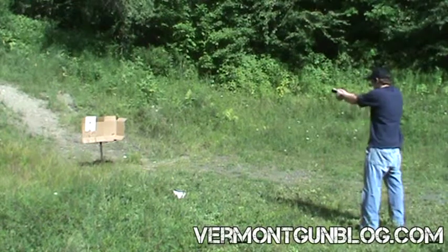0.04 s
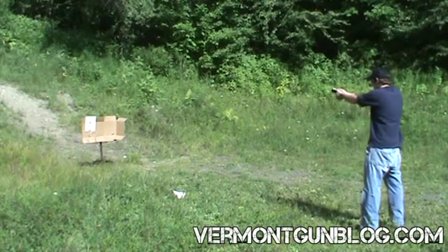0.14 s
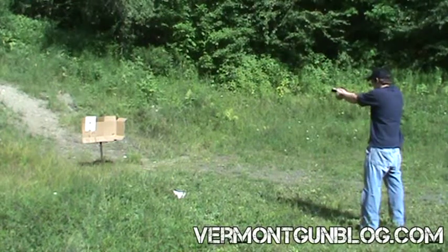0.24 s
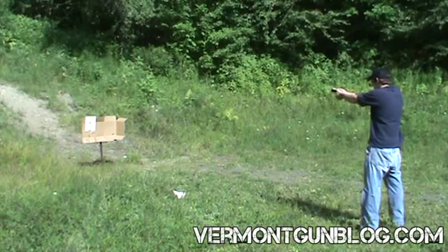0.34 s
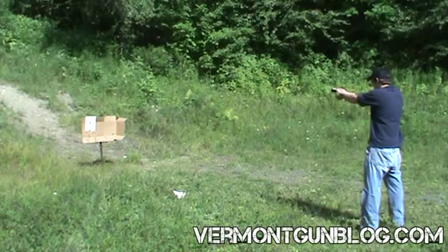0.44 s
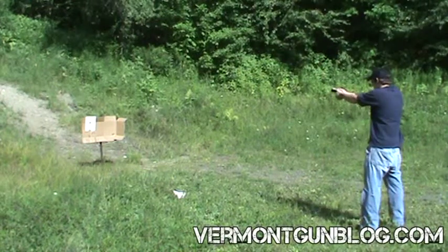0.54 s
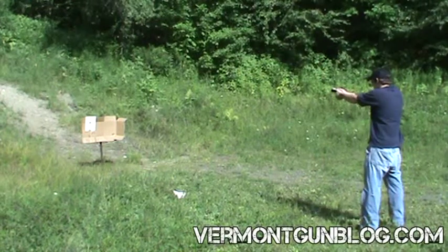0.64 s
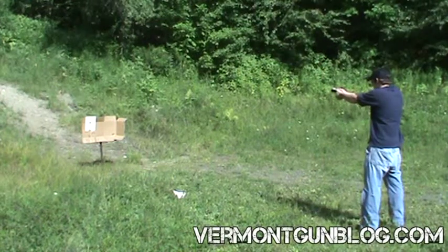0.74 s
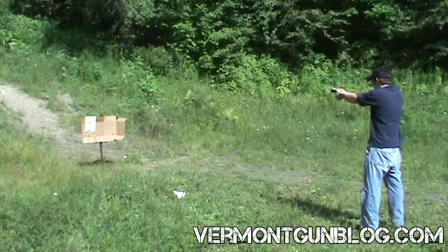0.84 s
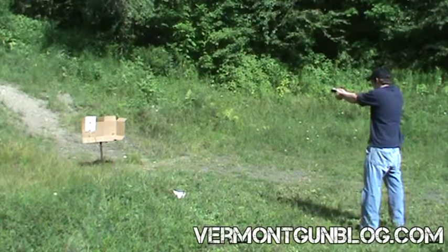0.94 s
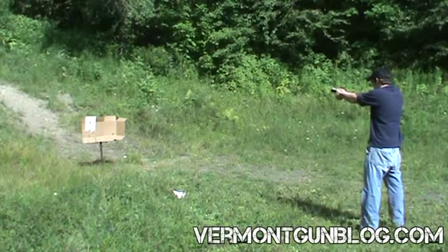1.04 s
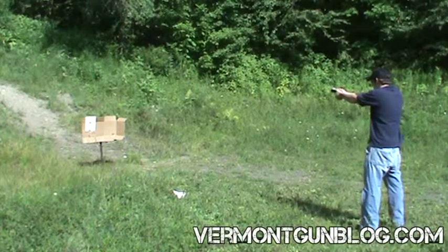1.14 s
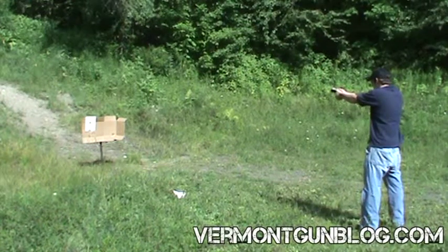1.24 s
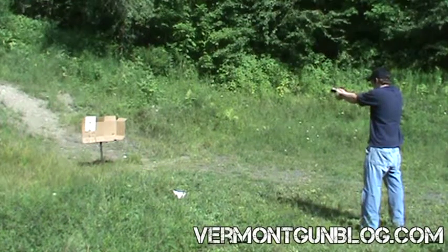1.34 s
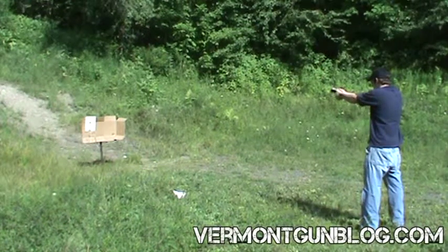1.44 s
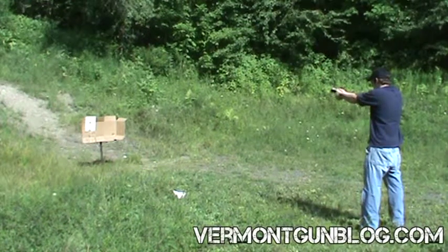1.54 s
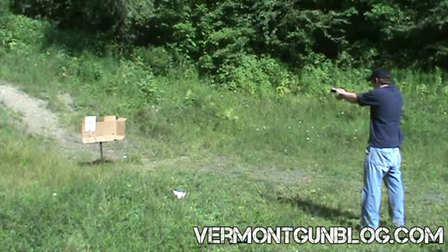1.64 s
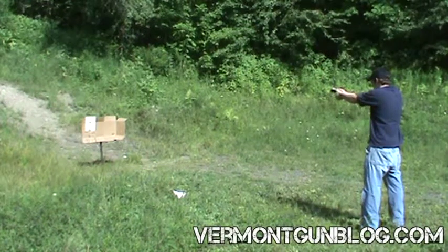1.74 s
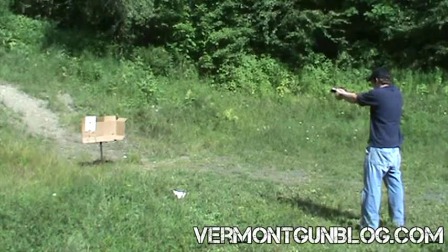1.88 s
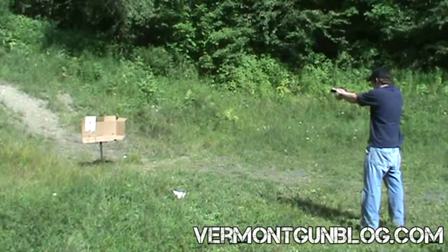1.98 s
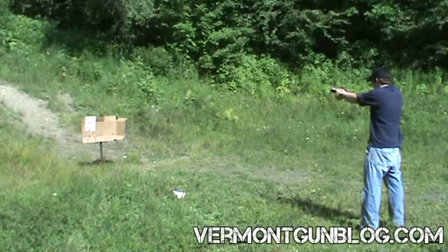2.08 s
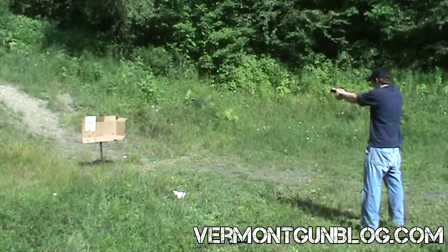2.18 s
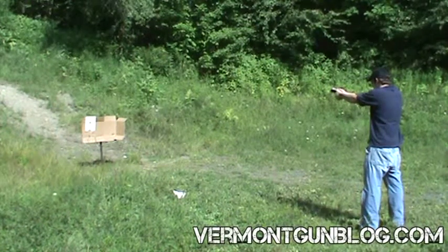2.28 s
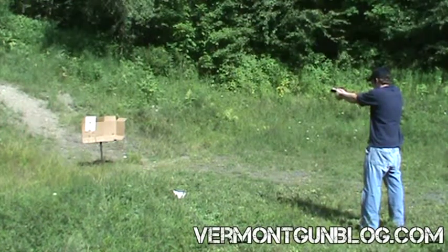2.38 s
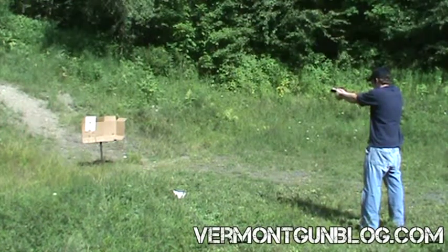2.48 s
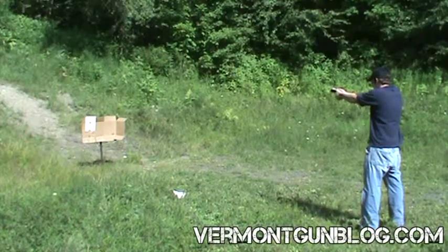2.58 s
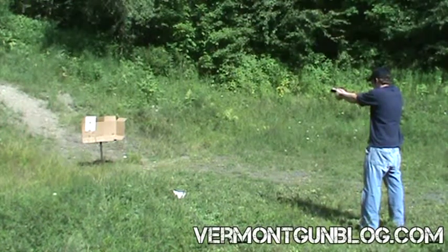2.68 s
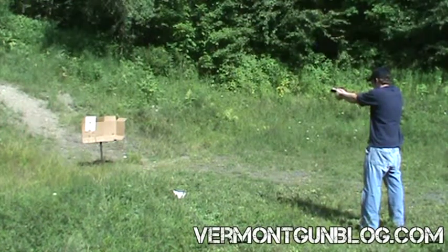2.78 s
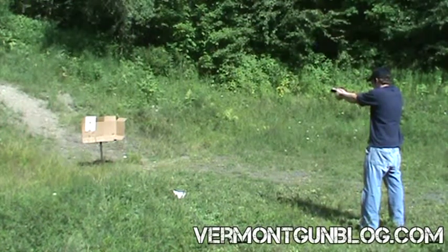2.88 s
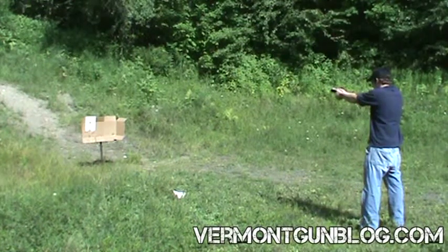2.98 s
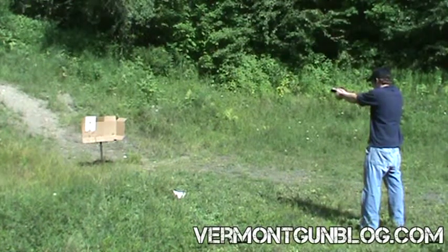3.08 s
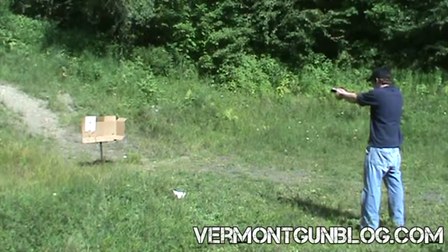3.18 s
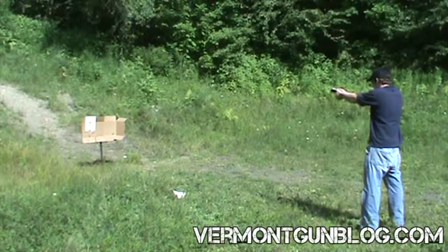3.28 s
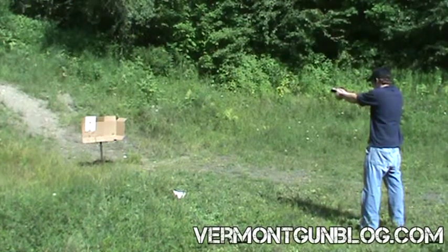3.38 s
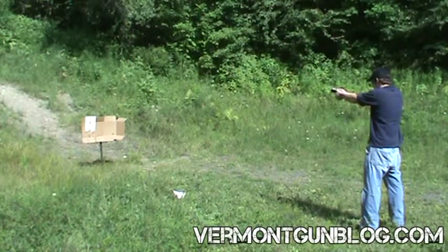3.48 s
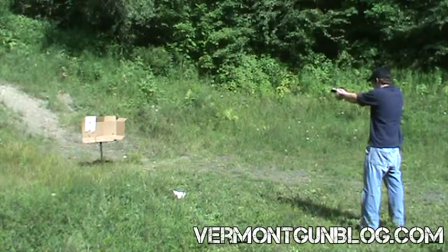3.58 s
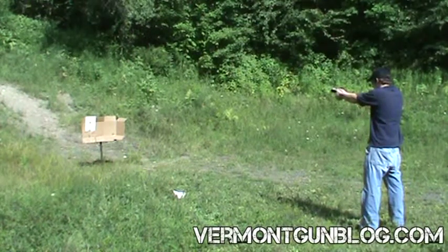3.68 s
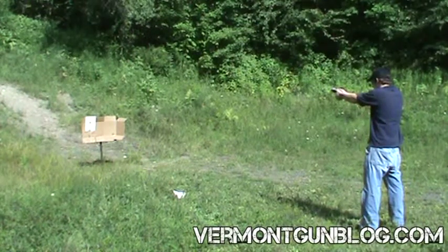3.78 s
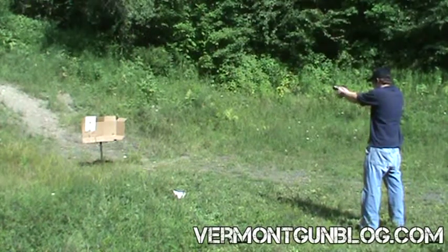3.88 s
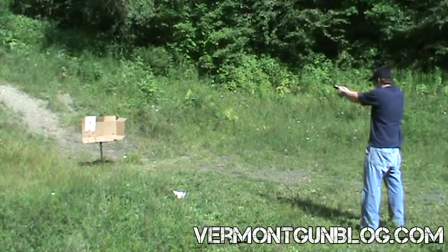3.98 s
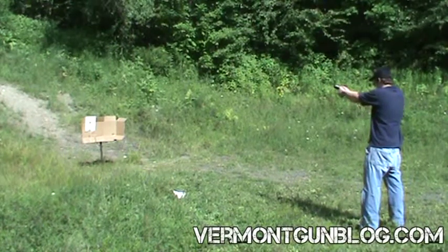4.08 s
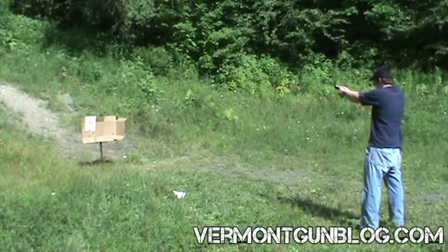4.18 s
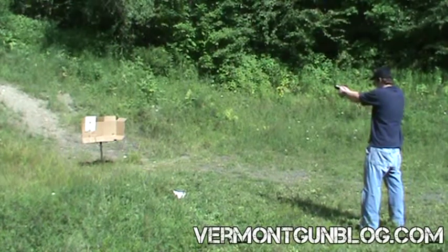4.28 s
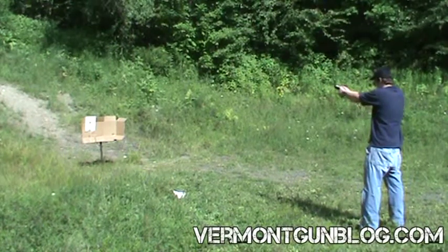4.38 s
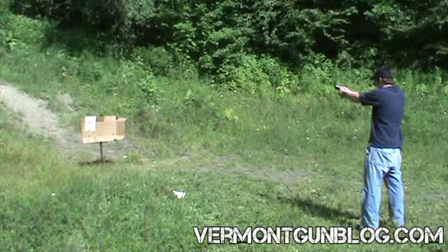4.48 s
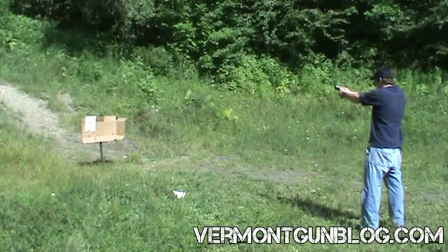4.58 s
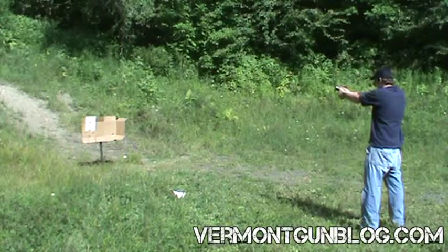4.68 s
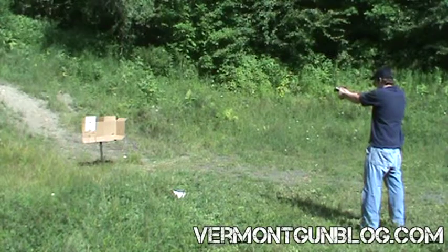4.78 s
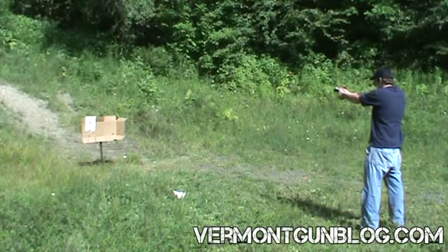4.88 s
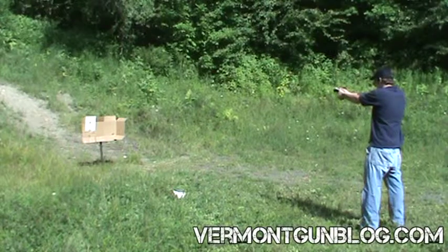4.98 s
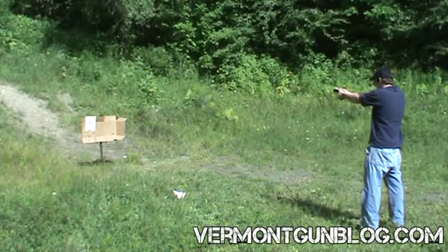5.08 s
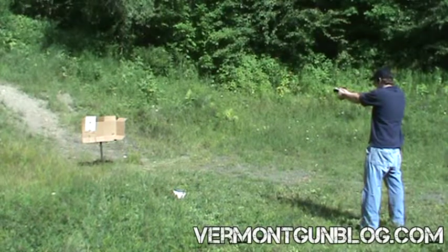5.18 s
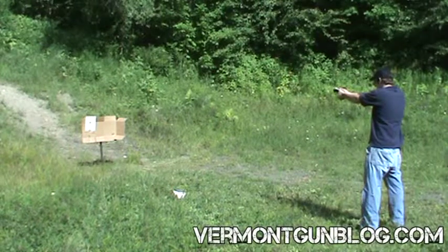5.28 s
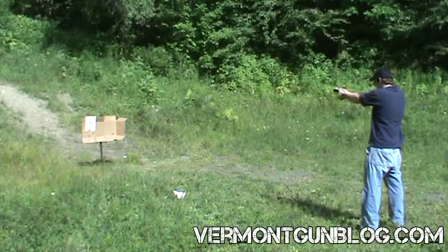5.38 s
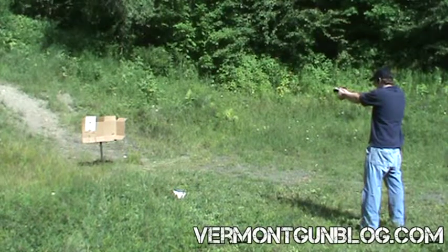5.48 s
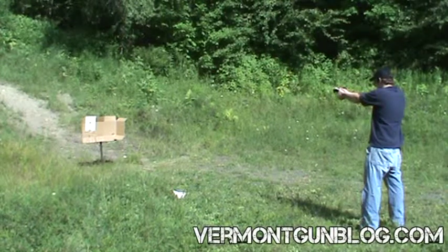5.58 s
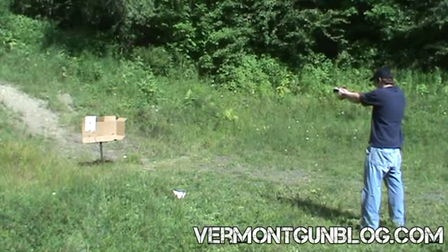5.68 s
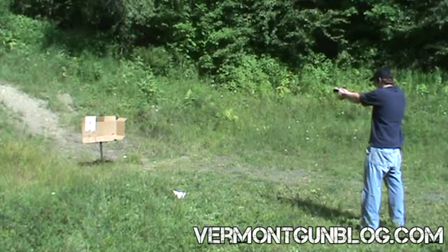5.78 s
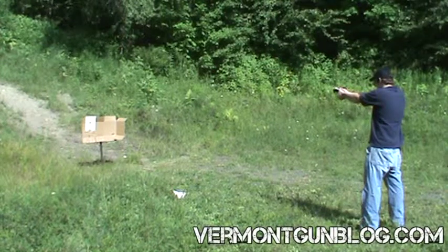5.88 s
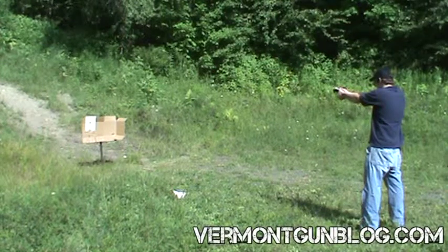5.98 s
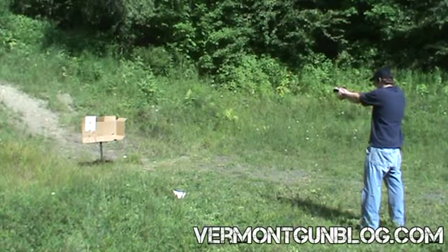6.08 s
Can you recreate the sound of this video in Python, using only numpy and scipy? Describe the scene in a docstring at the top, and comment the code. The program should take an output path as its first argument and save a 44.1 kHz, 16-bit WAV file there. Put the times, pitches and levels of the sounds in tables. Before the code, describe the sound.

Crickets chirp and trill in a breezy meadow, then one loud pistol shot cracks nearby and roars in a long echo off wooded slopes.

```python
"""Wind slaps the microphone and crickets chirp and trill in a summer meadow; then a pistol fires a few metres away.
The shot is a string of pressure jumps; noise shaped like a wooded slope's echo makes its long, darkening roar.
Crickets are short tones with a gliding pitch, wind and grass are coloured noise, the spent case is a tick and a ring.
The microphone overloads, and its gain control ducks the meadow, then lets it swell back."""
import sys
import numpy as np
from scipy import signal
from scipy.fft import rfft, irfft
from scipy.io import wavfile
from scipy.ndimage import uniform_filter1d

SR = 44100
rng = np.random.default_rng(int(sys.argv[2]) if len(sys.argv) > 2 else 0)


def transcribe(signal):
    """Save signal, clipped to [-1, 1], as a 16-bit WAV file at the path in sys.argv[1]."""
    frames = np.atleast_2d(signal).T
    limited = np.clip(frames, -1, 1)
    pcm = np.round(limited * 32767).astype(np.int16)
    wavfile.write(sys.argv[1], SR, pcm)


N = 270333
TIME = np.arange(N) / SR  # seconds
BINS = np.fft.rfftfreq(N, 1 / SR)  # Hz
SHOT_S = 3.9549  # the moment of the shot


def gain_of(db):
    """Turns decibels into a factor for the waveform."""
    return 10 ** (np.asarray(db) / 20)


def evened(x):
    """Scales a signal to an rms of 1."""
    return x / np.sqrt(np.mean(x ** 2) + 1e-20)


def read(points, hz):
    """Reads between the rows of a frequency table, on a logarithmic axis."""
    f, value = np.transpose(points)
    return np.interp(np.log(hz + 1), np.log(f + 1), value)


def level(points, t):
    """Reads a gain from a curve of times in seconds and levels in dB."""
    return gain_of(np.interp(t, *np.transpose(points)))


def panned(db):
    """Gives left and right gains that differ by db; a positive value leans left."""
    return gain_of(np.array([[1], [-1]]) * db / 2)


def add(mix, s, sound):
    """Mixes a sound in, starting at s seconds."""
    start = max(round(s * SR), 0)
    part = mix[..., start:][..., :sound.shape[-1]]
    part += sound[..., :part.shape[-1]]


def coloured(pair, db, same):
    """Gives two unrelated signals one spectrum; the part they share sets how alike left and right are."""
    a, b = rfft(pair)
    same = np.clip(same, -1, 1)
    mid = a * np.sqrt(1 + same)
    side = b * np.sqrt(1 - same)
    spectra = np.array([mid + side, mid - side]) * gain_of(db)
    return evened(irfft(spectra, N))


def noise(db, same):
    """Makes steady, coloured stereo noise with an rms of 1."""
    return coloured(rng.standard_normal((2, N)), db, same)


def ring(modes, t):
    """A struck object rings in several sine tones, each dying by 60 dB in its own time t60."""
    return sum(gain_of(db - 60 * t / t60) * np.sin(2 * np.pi * hz * t) for hz, db, t60 in modes)


def bump(hz, length):
    """A dull puff is noise about an octave wide that swells and fades, with an rms of 1."""
    band = signal.butter(2, [hz / np.sqrt(2), hz * np.sqrt(2)], "bandpass", fs=SR, output="sos")
    count = round(length * SR)
    filtered = signal.sosfilt(band, rng.standard_normal(SR))
    return evened(filtered[-count:] * np.hanning(count))


def swells(rows):
    """Gain of smooth swells that add in power; each row: centre in seconds, peak in dB, length in seconds."""
    power = 0
    for s, db, length in rows:
        phase = np.clip((TIME - s) / length, -.5, .5)
        power = power + (gain_of(db) * np.cos(np.pi * phase)) ** 2
    return np.sqrt(power)


def blast():
    """Each shock front jumps up, falls through a suction phase and shakes the microphone's housing."""
    # The muzzle blast and its first reflections. Each row: start in seconds, height of the jump in dB,
    # length of the overpressure in ms, left-right difference in dB.
    fronts = [(3.9554, -14, 0.22, 12), (3.9558, -7, .15, 11), (3.9569, -2, 1.95, 1), (3.9601, 1.5, 0.64, 6),
              (3.9615, -2.5, 0.3, -17), (3.963, 1.5, 0.33, -9), (3.9829, -11, 0.31, 5)]
    # Tones of the shaken housing. Each row: pitch in Hz, level against the jump in dB, t60 in seconds.
    housing = [(316, -11.5, 0.023), (906, -6.5, 0.013)]
    out = np.zeros((2, N))
    t = TIME[:SR // 10]
    for s, db, ms, pan_db in fronts:
        u = t * 1000 / ms  # time counted in overpressure lengths
        pressure = (1 - u) * np.exp(-u)
        add(out, s, gain_of(db) * panned(pan_db) * (pressure + ring(housing, t)))
    return out


def bank():
    """The earth bank answers the shot with a few dull thuds."""
    # Each row: centre in seconds, rms level in dB, middle of the band in Hz, length in seconds.
    thuds = [(3.999, -27, 274, .035), (4.027, -24.5, 177, 0.0343), (4.296, -15, 775, .08)]
    out = np.zeros(N)
    for s, db, hz, length in thuds:
        add(out, s - length / 2, gain_of(db) * bump(hz, length))
    return out


def scatter(colour, per_s, wash):
    """Single reflections from trunks and stones (per_s a second) lie over a wash from countless leaves."""
    # How alike left and right are. Each row: frequency in Hz, likeness (1 means the same).
    likeness = [(50, 0.36), (300, 0.86), (700, 0.74), (1300, 0.5), (2500, 0.75), (6000, 0.76),
                (10000, 0.56), (11500, 1)]
    sparse = rng.standard_normal((2, N)) * (rng.random((2, N)) < per_s / SR)
    pair = evened(sparse) + wash * rng.standard_normal((2, N))
    return coloured(pair, read(colour, BINS), read(likeness, BINS))


def near_echo():
    """Scatter from nearby sags while the front crosses the clearing, then dies fast."""
    # Colour of grass and bushes nearby. Each row: frequency in Hz, relative level in dB per Hz.
    near_colour = [(30, -28), (120, -11), (250, 5), (700, 8), (1400, 0), (3000, -11.5), (8000, -7),
                   (12000, -12.5), (16000, -21)]
    top_db, sag_db_per_s = -7, 53
    clearing_s, fall_db_per_s = 0.1, 230
    near_db = top_db - sag_db_per_s * TIME - fall_db_per_s * np.maximum(TIME - clearing_s, 0)
    return scatter(near_colour, per_s=2900, wash=0.99) * gain_of(near_db)


def narrowed(pair, db_per_s):
    """Late echoes come from far off, straight ahead, so left and right grow alike."""
    mid = pair.mean(0)
    return mid + (pair - mid) * gain_of(-db_per_s * TIME)


def woods_echo():
    """The roar grows as the front climbs the slope, then thins; longer paths lose more treble to the air."""
    # Colour of the wooded slope. Each row: frequency in Hz, relative level in dB per Hz.
    woods_colour = [(30, -33), (110, -18), (200, -17), (350, -4), (600, 2.5), (900, 3), (1400, -4.5),
                    (2100, -2.5), (2650, -5), (3200, -2.5), (3700, -4.5), (7000, -2.5), (11000, -4.5),
                    (16000, -16.5)]
    # What the air takes. Each row: frequency in Hz, loss in dB per second.
    air_loss = [(100, 12), (300, 3.9), (700, 4.6), (1100, 5.25), (2000, 12.2), (3500, 25), (6000, 42),
                (9000, 64.3), (15000, 120)]
    # Side the echo leans to. Each row: frequency in Hz, left-right difference in dB.
    lean = [(60, 4), (150, 1), (380, 1), (950, -2.5), (2380, 0), (5980, 1.0), (15000, -0.5)]
    # Further lean as the echo rolls along. Each row: seconds after the shot, left-right difference in dB.
    swing = [(0, 1), (.4, -0.5), (.7, -2.5), (1.2, -1), (2.1, -0.5)]
    top_db, trunks_db_per_s = .5, 6.5  # the trunks take their share beyond the crest
    climb_s, climb_power = 0.26, 0.65
    crest_s, spread_power = 0.38, 1.55
    patchy_db = 1.0  # clumps of trees answer unevenly

    hz, t, z = signal.stft(scatter(woods_colour, per_s=900, wash=2.28), SR, nperseg=512)
    patches = uniform_filter1d(rng.standard_normal(z.shape[1:]), size=9, axis=0)
    patches = evened(uniform_filter1d(patches, size=5, axis=1))
    z = z * gain_of(patchy_db * patches - read(air_loss, hz)[:, None] * t)
    z = z * panned(read(lean, hz))[:, :, None]

    climb = np.minimum(TIME / climb_s, 1) ** climb_power
    beyond = np.maximum(TIME - crest_s, 0)
    spread = (1 + beyond / crest_s) ** spread_power
    roll = climb * gain_of(top_db - trunks_db_per_s * beyond) / spread
    woods = signal.istft(z, SR, nperseg=512)[1][:, :N] * roll
    return narrowed(woods, db_per_s=2.5) * panned(np.interp(TIME, *np.transpose(swing)))


def echoes():
    """Bright scatter from close by and the roar of the woods both set off at the shot."""
    out = np.zeros((2, N))
    add(out, SHOT_S, near_echo() + woods_echo())
    return out


def hills():
    """Only the low end of the shot returns from the distant hills, as a last rumble."""
    # Colour of the rumble. Each row: frequency in Hz, relative level in dB per Hz.
    rumble_colour = [(60, -26), (170, -6.5), (280, -8), (430, 3), (800, -1.5), (1300, -21), (3000, -37)]
    # Its rise and fall. Each row: seconds after the shot, level in dB.
    rumble_db = [(0, -78), (.7, -43), (1.4, -43), (2.2, -52.5)]
    strength = level(rumble_db, TIME - SHOT_S) * (TIME > SHOT_S)
    return strength * noise(read(rumble_colour, BINS), same=1.0)


def spent_case(tick_s=0.00092):
    """Brass lands on gravel with a dry tick, noise that dies within ms, and a short high ring."""
    # Each row: start in seconds, level in dB.
    case_hits = [(4.832, -35), (5.163, -29.5)]
    # Tones of the case. Each row: pitch in Hz, level within the hit in dB, t60 in seconds.
    brass = [(4330, -7, 0.0097), (5000, -5, 0.01), (10500, -9, .008), (13340, -9, 0.019)]
    out = np.zeros(N)
    t = TIME[:SR // 10]
    thin = signal.butter(2, 4000, "highpass", fs=SR, output="sos")
    for s, db in case_hits:
        tick = signal.sosfilt(thin, rng.standard_normal(len(t)) * np.exp(-t / tick_s))
        add(out, s, gain_of(db) * (0.88 * tick + ring(brass, t)))
    return out


def stroke(hz, length, crest, sag):
    """A scraper runs along the wing's file: it speeds up to a crest, then slows, and the pitch follows."""
    u = np.arange(0, 1, 1 / (length * SR))  # share of the stroke done
    waver = evened(uniform_filter1d(rng.standard_normal(len(u)), size=60))
    pitch = hz * (1 - sag * (u - crest) ** 2 + 0.0075 * waver)
    swell = np.sin(np.pi * u) ** 0.88
    return swell * np.sin(2 * np.pi * np.cumsum(pitch) / SR)


def beats(first, last, period):
    """Spaces strokes evenly from the first to the last, about one period apart."""
    return np.linspace(first, last, round((last - first) / period) + 1)


def near_field_cricket(stroke_s, crest, sag):
    """Each chirp works up to full effort over three slowing strokes, the first softest and flattest."""
    # Each row is a chirp: start in seconds, seconds from first to second stroke, full-effort level in dB.
    chirps = [(.18, 0.032, -37.5), (.462, .037, -36.5), (.874, .0325, -36.5), (1.1745, 0.032, -36),
              (1.5035, .032, -36.5), (1.84, .0315, -38), (2.151, .0323, -37), (2.7232, .0304, -37.5),
              (3.1505, 0.032, -38), (3.6945, 0.031, -39)]
    full_hz = 5072  # pitch at full effort
    slowing = 1.155  # each gap is this many times the one before
    soft_start_db, flat_start = 5.5, 0.0295  # what the first stroke lacks in level, and as a share of pitch
    warm_up = 0.26  # share of the lack left at each next stroke
    out = np.zeros(N)
    for s, gap, db in chirps:
        for k in range(3):
            lack = warm_up ** k
            sound = stroke(full_hz * (1 - flat_start * lack), stroke_s, crest, sag)
            add(out, s, gain_of(db - soft_start_db * lack) * sound)
            s = s + gap * slowing ** k
    return out


def neighbour_crickets(stroke_s, crest, sag):
    """Field crickets further off chirp in evenly spaced strokes of slightly varying pitch."""
    # Each row is a chirp: first stroke in seconds, last stroke in seconds, average pitch in Hz, level in dB.
    neighbour_chirps = [(.086, .154, 4680, -51), (.86, .895, 4790, -44), (1.31, 1.386, 4710, -48),
                        (1.825, 1.857, 4750, -53), (3.035, 3.07, 4700, -55), (3.556, 3.599, 4700, -55),
                        (4.873, 4.912, 4900, -49), (5.293, 5.33, 4930, -52.5), (5.642, 5.678, 4930, -52)]
    out = np.zeros(N)
    for first, last, hz, db in neighbour_chirps:
        for s in beats(first, last, period=.037):
            add(out, s, gain_of(db) * stroke(hz + rng.normal(0, 45), stroke_s, crest, sag))
    return out


def field_crickets(stroke_s=.022, crest=.37, sag=0.32):
    """The near cricket and its neighbours scrape with the same kind of stroke."""
    return near_field_cricket(stroke_s, crest, sag) + neighbour_crickets(stroke_s, crest, sag)


def ground_cricket():
    """Evenly spaced strokes near 8 kHz make trills, with small changes of pitch and level."""
    # Each row is a trill: first stroke in seconds, last stroke in seconds, about how many seconds lie
    # between strokes, average pitch in Hz, average level in dB.
    trills = [(0.044, 0.835, .053, 8080, -54.5), (1.274, 1.335, .058, 7950, -58),
              (1.703, 1.964, .051, 8000, -58.5), (2.25, 2.503, .051, 8000, -59.5),
              (3.038, 3.925, .052, 8020, -56.5), (4.629, 6.094, .0521, 7910, -56)]
    out = np.zeros(N)
    for first, last, period, hz, db in trills:
        for s in beats(first, last, period):
            gain = gain_of(db + rng.normal(0, 0.35))
            sound = stroke(hz + rng.normal(0, 39), length=0.016, crest=0.4, sag=.28)
            add(out, s - .009, gain * sound)  # the table's time falls near the middle of the stroke
    return out


def crickets(wet_db=-11, t60=.13):
    """Field crickets a little to the right, the ground cricket well to the left; the grass blurs them."""
    direct = field_crickets() * panned(db=-6.0) + ground_cricket() * panned(db=16.5)
    t = TIME[:SR // 4]
    grass = rng.standard_normal((2, len(t))) * gain_of(-60 * t / t60)
    blur = signal.fftconvolve(direct, grass / np.linalg.norm(grass[0]), axes=1)[:, :N]
    return direct + gain_of(wet_db) * blur


def far_crickets(uneven_db=2, pan_db=13.0):
    """Crickets further out trill without pause, each on its own beat; the strokes overlap into a shimmer."""
    # Each row is a cricket: average pitch in Hz, seconds between strokes, average level in dB.
    far_trills = [(8540, 0.039, -62.5), (8430, 0.052, -65.5), (5600, 0.028, -61)]
    out = np.zeros(N)
    for hz, period, db in far_trills:
        for s in np.arange(period * rng.random(), TIME[-1], period):
            late, loud, sharp = rng.standard_normal(3)
            sound = stroke(hz * (1 + 0.0077 * sharp), length=.019, crest=0.412, sag=0.26)
            add(out, s + .002 * late, gain_of(db + uneven_db * loud) * sound)
    return out * panned(pan_db)


def breeze(wind_db=-1.0):
    """A slackening breeze buffets the microphone with low noise and lumpy gusts, among a few soft bumps."""
    # The steady part. Each row: time in seconds, level in dB before wind_db and the lull.
    wind = [(0.0, -47), (0.57, -53), (0.97, -43.5), (1.75, -53.5), (2.76, -53), (3.36, -62.5), (3.9, -58.5)]
    # Single slaps. Each row: centre in seconds, peak in dB, length in seconds.
    gusts = [(.025, -38, 0.12), (.21, -38.5, 0.085), (.3, -40.5, .09), (.52, -46, 0.074), (.67, -43, .09),
             (.8, -32.5, 0.12), (.92, -41, 0.097), (.99, -33.5, 0.092), (1.08, -39, 0.075),
             (1.24, -38.5, 0.12), (1.34, -39.5, .08), (1.43, -46, .22), (2.8, -51.5, .28)]
    # Colour of the wind noise. Each row: frequency in Hz, relative level in dB per Hz.
    buffet = [(15, -2), (35, 2), (80, -3.5), (130, -11.5), (220, -23), (500, -37), (1500, -56)]
    # Soft bumps. Each row: centre in seconds, rms level in dB, middle of the band in Hz, length in seconds.
    soft_bumps = [(0.573, -57, 310, .13), (0.582, -48.5, 160, 0.048), (3.359, -54, 109, 0.054)]
    lull_s, lull_db_per_s = 3.6, 12  # from here the steady part dies away
    lull_db = lull_db_per_s * np.maximum(TIME - lull_s, 0)
    steady = gain_of(wind_db - lull_db) * level(wind, TIME)
    strength = np.hypot(steady, swells(gusts))
    out = strength * noise(read(buffet, BINS), same=0.55) * panned(db=1.0)
    for s, db, hz, length in soft_bumps:
        add(out, s - length / 2, gain_of(db) * bump(hz, length))
    return out


def meadow(air_db=-50.0):
    """Still air and hiss, the farthest insects merged into steady bands of noise, and stirring grass."""
    # Colour of the air and hiss. Each row: frequency in Hz, relative level in dB per Hz.
    air_colour = [(20, 3), (60, 1), (150, 0.5), (350, 0.5), (800, 1), (1500, -4.5), (3000, -7), (5000, -9),
                  (7000, -11.5), (10000, -15.5), (15500, -18.5)]
    # How alike left and right are. Each row: frequency in Hz, likeness (1 means the same).
    air_same = [(50, 1), (300, 0.78), (900, 0.47), (2000, 0.44), (10000, 0.57), (11500, 0.94)]
    # Insect bands. Each row: middle in Hz, width in Hz, level in dB over the air's 0.
    chorus = [(3602, 13, 0), (5030, 370, -5.5), (5530, 190, -4), (7700, 270, -13.5), (8520, 340, -10)]
    # Colour of the grass. Each row: frequency in Hz, relative level in dB per Hz.
    rustle = [(300, -20), (2000, -3), (5000, -3), (9500, -6), (12000, -14), (16000, -27)]
    # When the grass stirs. Each row: centre in seconds, peak in dB, length in seconds.
    stirs = [(1.9, -58, 0.23), (2.78, -60, .24), (3.9, -56, .35), (5.4, -55.5, 1.6), (5.64, -51.5, 0.12)]
    power = gain_of(read(air_colour, BINS)) ** 2
    for hz, width, db in chorus:
        power = power + gain_of(db) ** 2 * np.exp(-.5 * ((BINS - hz) / width) ** 2)
    air = gain_of(air_db) * noise(10 * np.log10(power), read(air_same, BINS))
    return air + swells(stirs) * noise(read(rustle, BINS), same=0.49)


def scene():
    """The shot and its echoes sound over the living meadow."""
    shot = blast() + bank() + echoes() + hills() + spent_case()
    return shot + crickets() + far_crickets() + meadow() + breeze()


def record(dry, ceiling=1.64, limit_db=-14, attack_s=0.011, recovery_db=5.0):
    """The microphone saturates; its gain falls fast and creeps back; then come clipping and a treble limit."""
    x = ceiling * np.tanh(dry / ceiling)
    r = np.exp(-1 / (attack_s * SR))
    power_db = 10 * np.log10(signal.lfilter([1 - r], [1, -r], (x ** 2).mean(0)) + 1e-12)
    creep = recovery_db * TIME  # dB
    held_db = np.maximum.accumulate(power_db + creep) - creep  # loudest so far, sinking at recovery_db a second
    over_db = np.maximum(held_db - limit_db, 0)
    r = np.exp(-1 / (0.001 * SR))  # the gain lags, so the first crack gets through
    cut_db = signal.lfilter([1 - r], [1, -r], over_db)
    x = np.clip(x / gain_of(cut_db), -1, 1)
    edge_hz = 15850
    low_pass = signal.firwin(511, edge_hz, window=("kaiser", 9), fs=SR)
    return signal.oaconvolve(x, low_pass[None], "same")


dry = scene()
out = record(dry)
transcribe(out)
```